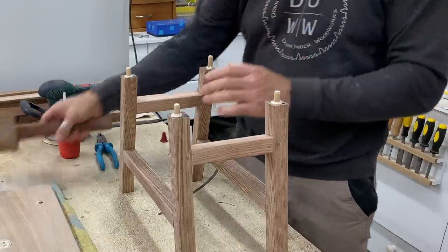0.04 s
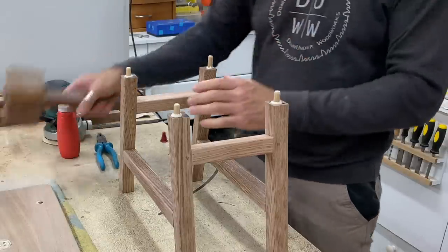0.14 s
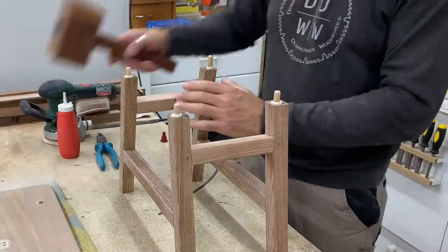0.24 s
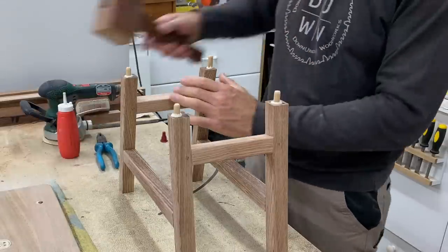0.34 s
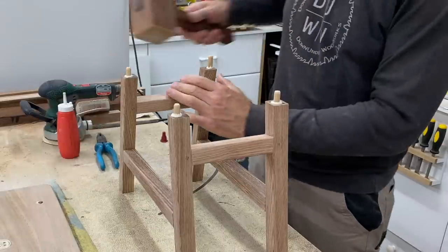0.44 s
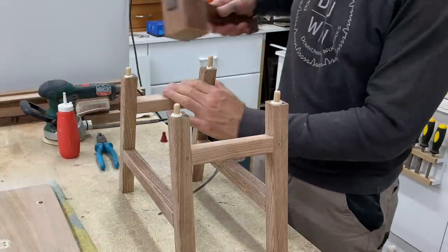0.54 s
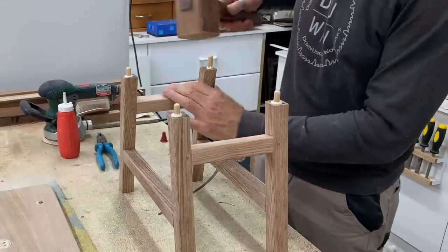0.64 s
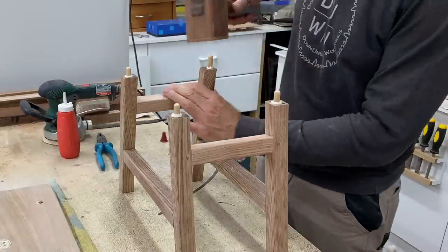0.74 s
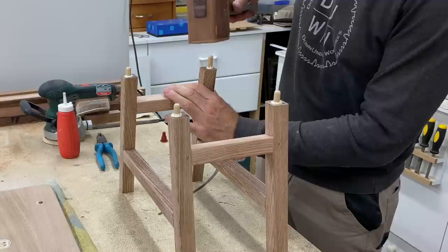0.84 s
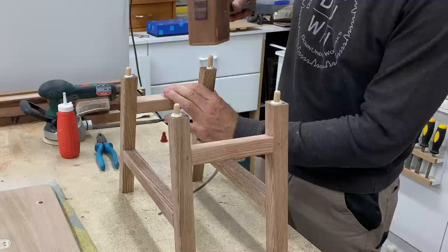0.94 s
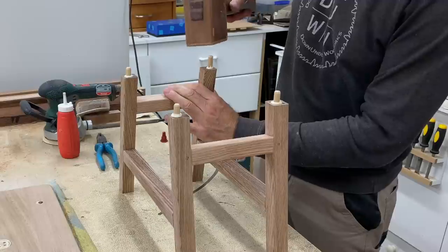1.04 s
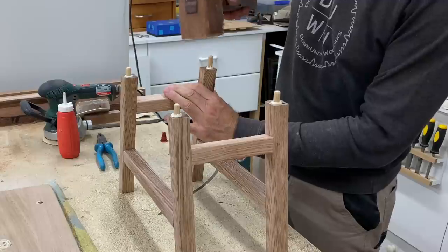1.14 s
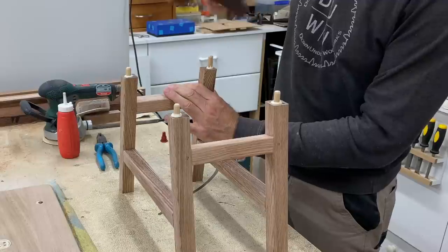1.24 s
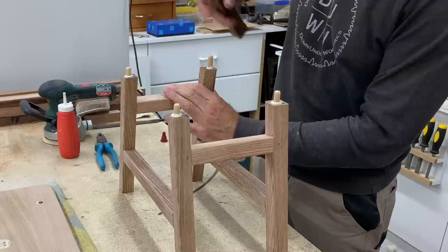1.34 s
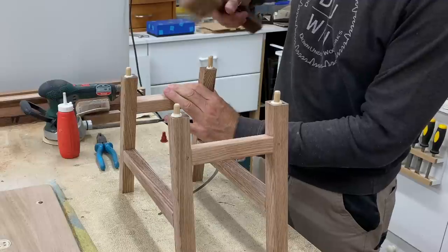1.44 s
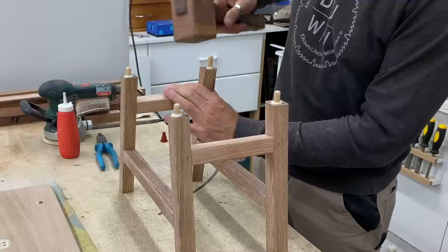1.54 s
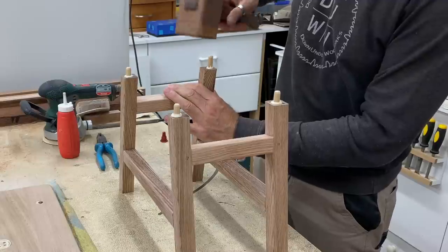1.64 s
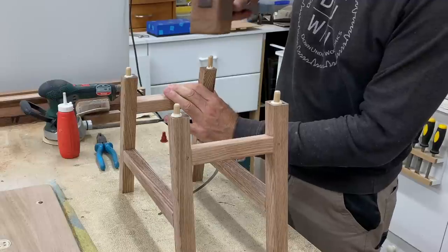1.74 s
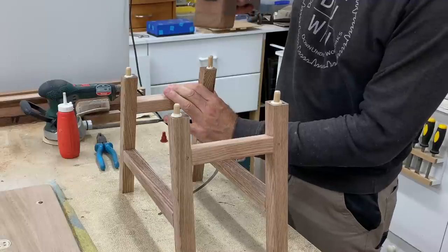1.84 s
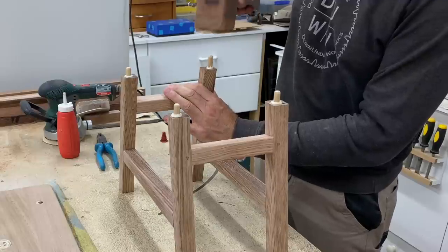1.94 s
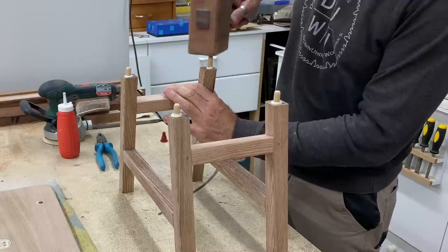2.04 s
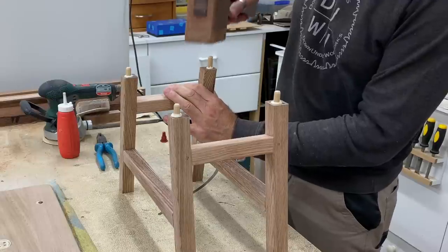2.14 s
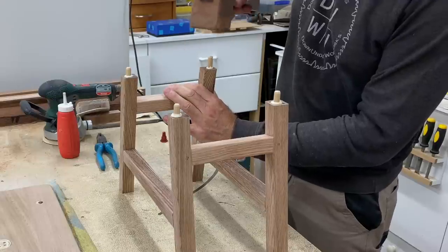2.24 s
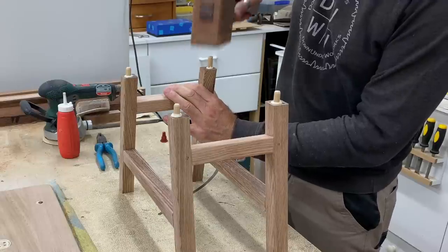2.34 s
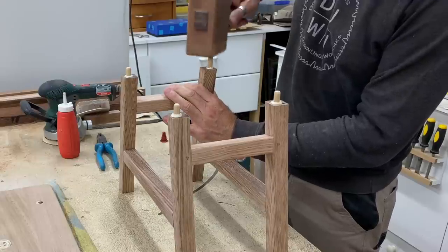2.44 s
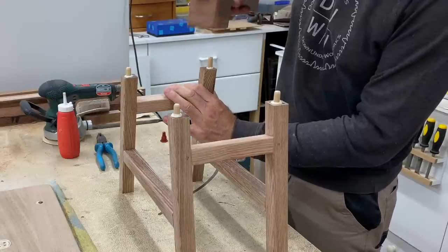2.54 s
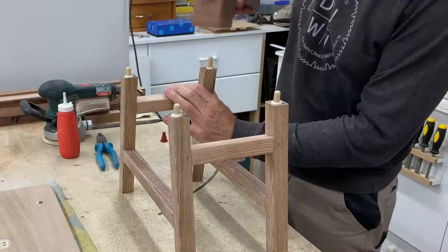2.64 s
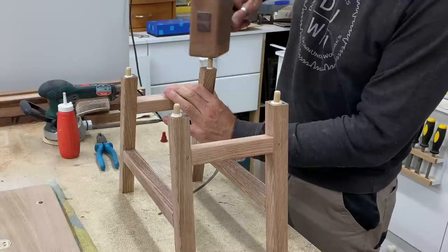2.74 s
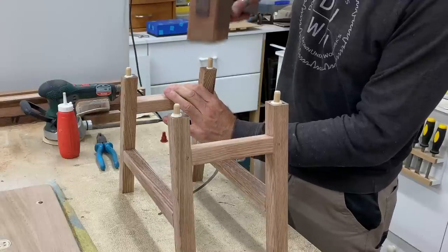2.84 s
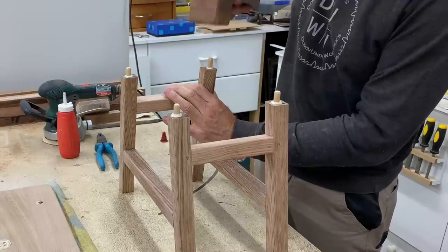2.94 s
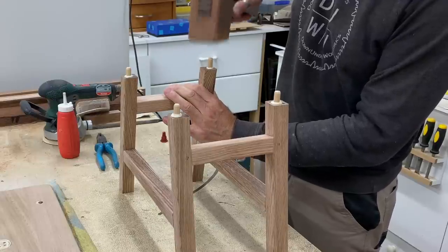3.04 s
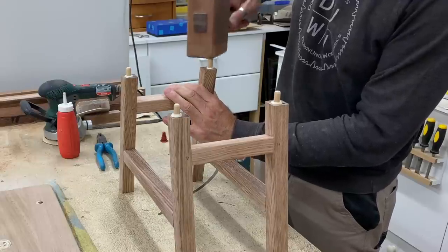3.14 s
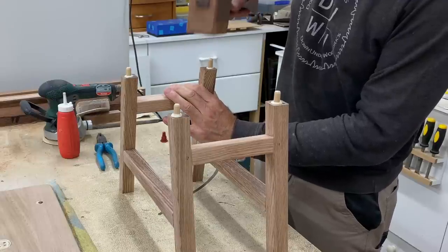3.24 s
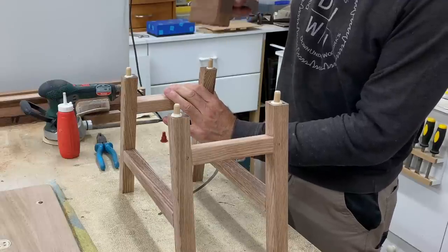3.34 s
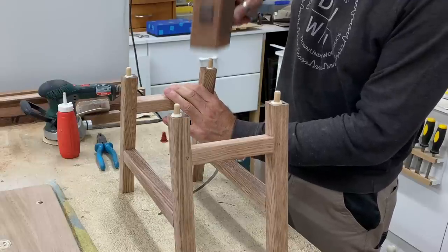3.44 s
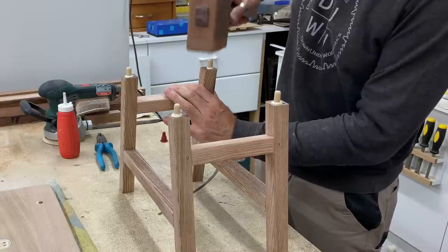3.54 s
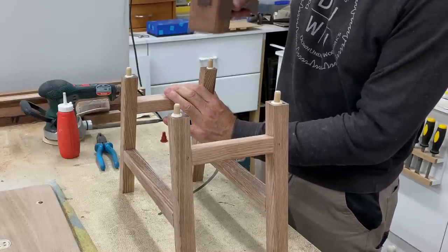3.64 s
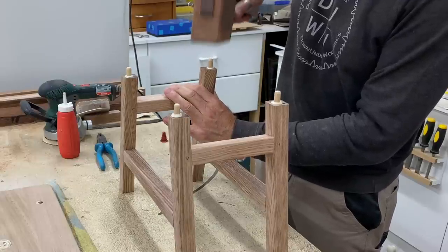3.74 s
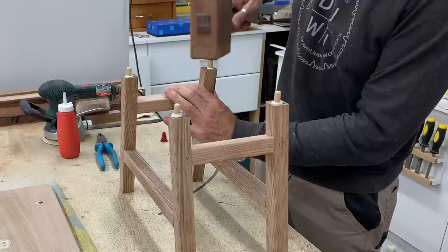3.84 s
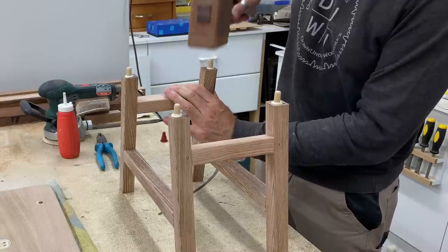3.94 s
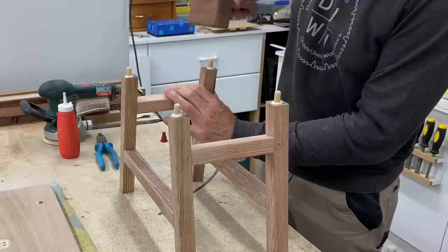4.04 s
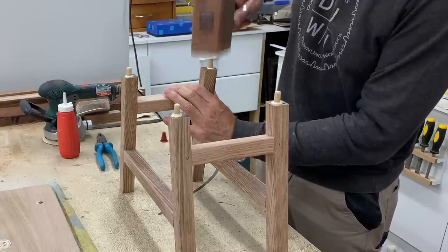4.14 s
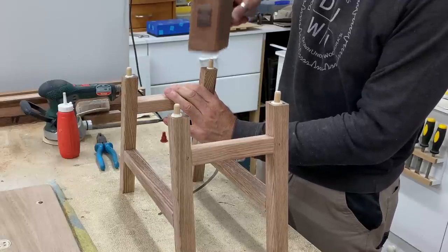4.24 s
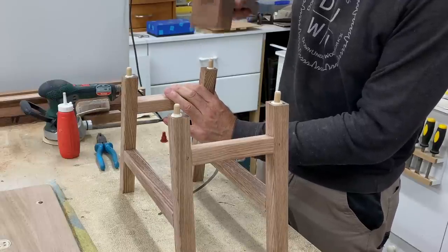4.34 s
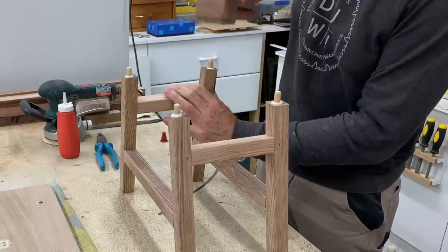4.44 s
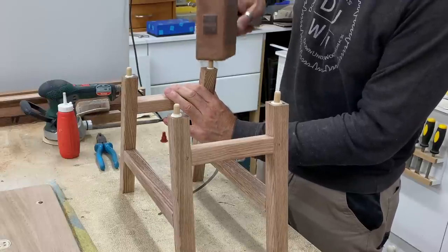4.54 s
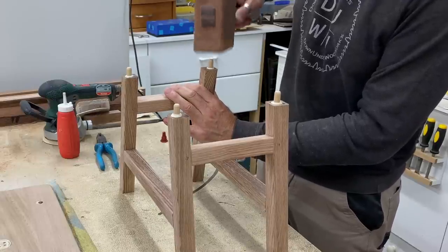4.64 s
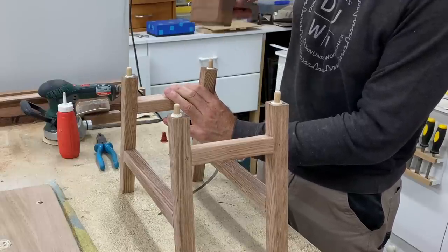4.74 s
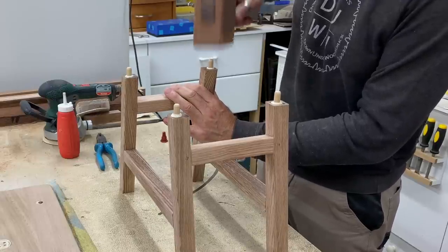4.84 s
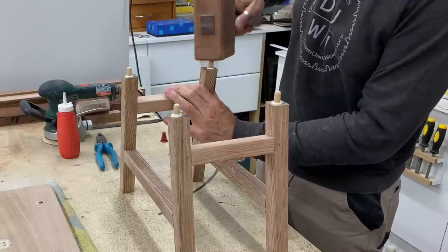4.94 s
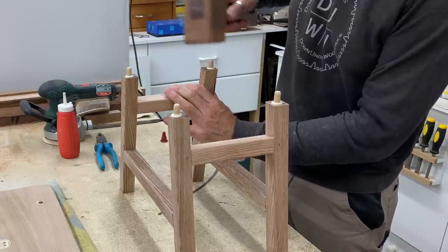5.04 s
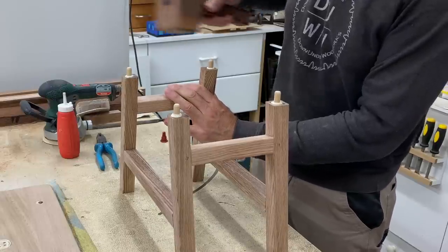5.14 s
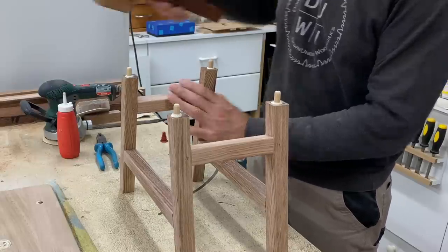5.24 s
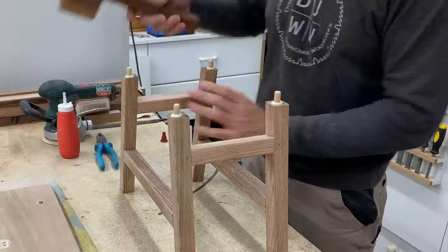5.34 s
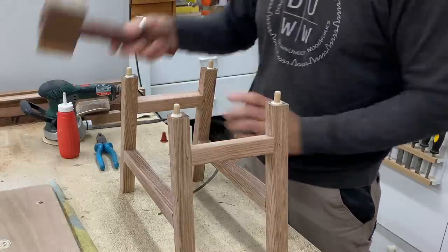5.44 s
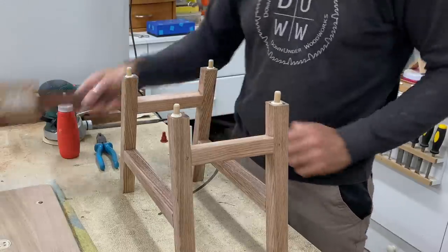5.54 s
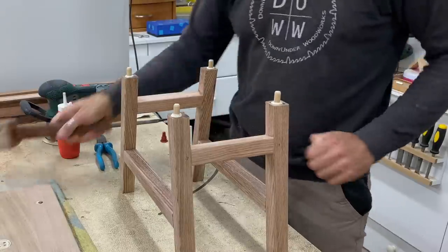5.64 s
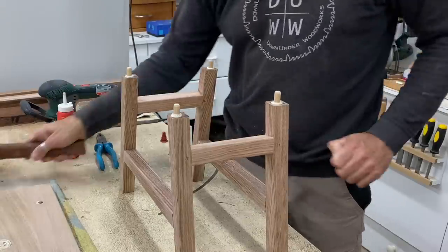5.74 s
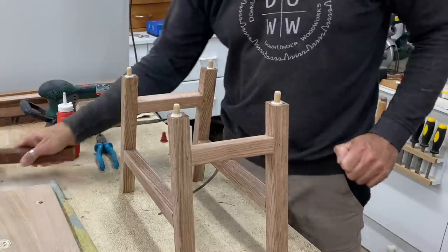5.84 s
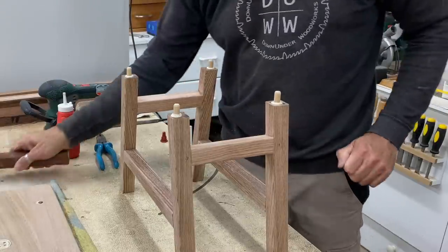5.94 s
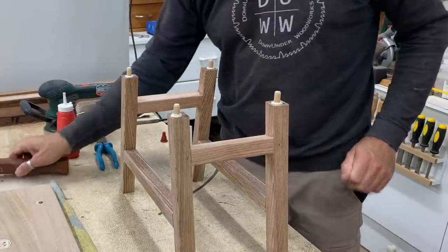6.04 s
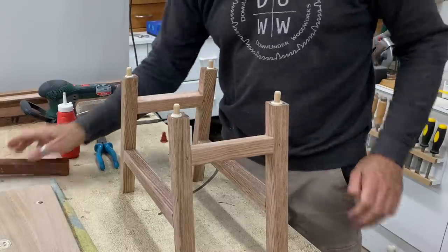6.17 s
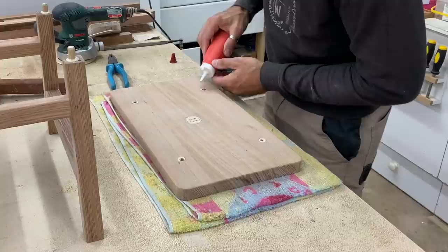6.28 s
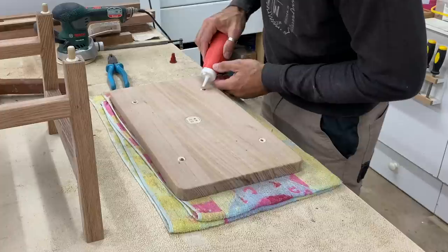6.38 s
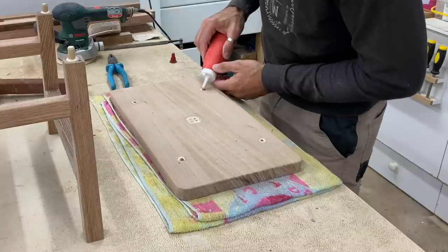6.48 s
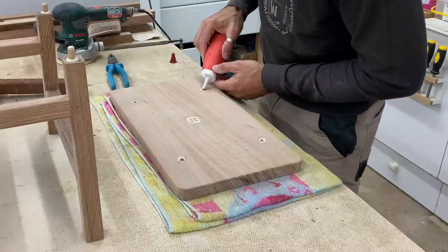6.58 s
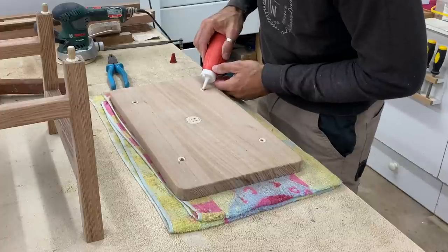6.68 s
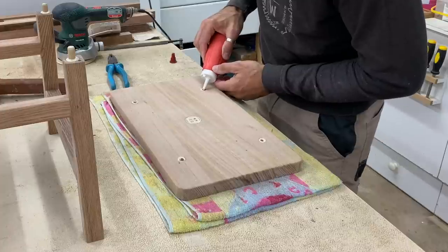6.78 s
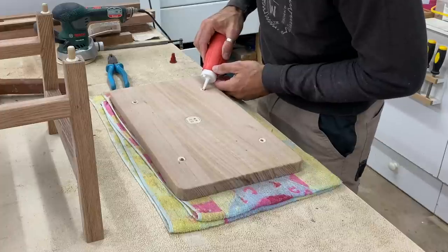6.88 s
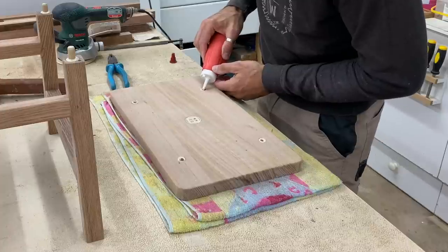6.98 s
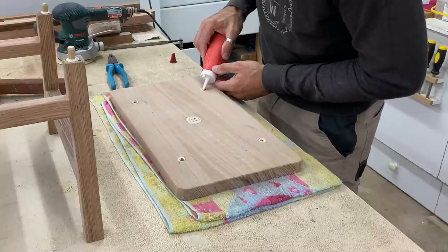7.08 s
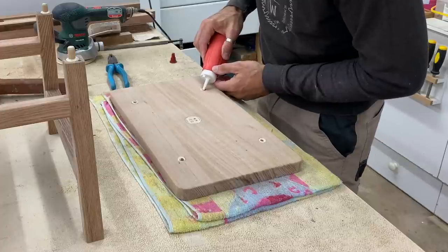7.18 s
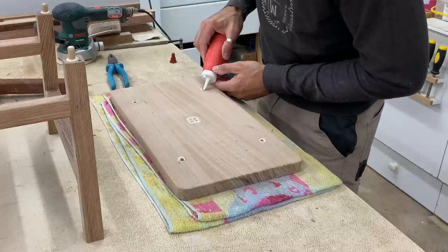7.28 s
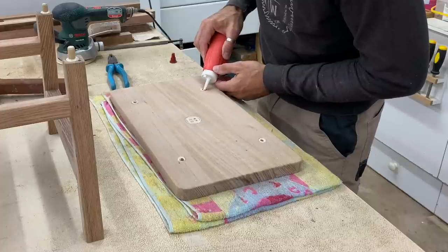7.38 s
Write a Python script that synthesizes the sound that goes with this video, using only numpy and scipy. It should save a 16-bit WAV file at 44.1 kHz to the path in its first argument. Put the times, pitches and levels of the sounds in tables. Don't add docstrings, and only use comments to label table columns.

```python
import sys
import numpy as np
from scipy import signal
from scipy.fft import rfft, irfft, next_fast_len
from scipy.io import wavfile
from scipy.ndimage import uniform_filter1d

SR = 44100
rng = np.random.default_rng(int(sys.argv[2]) if len(sys.argv) > 2 else 0)


def to_wav(sig):
    pcm = np.clip(np.atleast_2d(sig), -1, 1) * 32767
    pcm = np.round(pcm).astype(np.int16)
    wavfile.write(sys.argv[1], SR, pcm.T)


def ratio_of_db(decibels):
    return 10 ** (np.asarray(decibels, float) / 20)


N = 326781
CUT_S = 6.318

# frequency in Hz, level in dB per Hz.
AIR_SPECTRUM = [(30, -27.5), (45, 0.5), (65, 4), (120, -13.5), (200, -20.5), (350, -24.5), (800, -19.5),
                (1400, -26.5), (2500, -30.5), (6000, -39.5), (8000, -45), (11000, -54), (14000, -62.5),
                (16000, -72.5)]
AIR_DB = -57
# frequency in Hz, likeness from -1 to 1.
AIR_LIKENESS = [(60, 0.97), (130, 0.8), (290, 0.54), (640, -0.54), (1410, -0.29), (3100, 0.3), (6820, 0.17),
                (15000, 0.29)]
# frequency in Hz, gain in dB.
BUSIER_AIR = [(30, 2), (150, 7.5), (350, 8.5), (600, 2), (1000, 0.5), (5000, 1), (12000, 0)]
# time in seconds, gain in dB.
AIR_SWELL = [(0, -2), (1.9, -0.5), (5.2, 3.5), (6.3, 2), (6.9, 2), (7.41, 0.5)]

# time in seconds, level in dB.
HUM = [(0, -60.5), (.85, -51.5), (1.3, -52), (1.7, -59), (2.0, -70), (2.3, -63), (2.9, -53), (3.41, -49),
       (3.8, -56), (4.05, -63), (4.3, -53.5), (4.55, -56.5), (4.8, -50), (5.2, -51), (5.5, -50), (5.9, -51),
       (6.16, -46), (6.3, -55.5)]
HUM_HZ, RUMBLE_HZ, RUMBLE_DB = 150.4, 75, -55.5
# loudest moment in seconds, rise in seconds, fall in seconds, level in dB.
WHINE = [(.85, .6, 0.46, -71), (1.95, 1.1, 0.63, -67), (3.4, .8, .8, -73), (4.35, .5, 0.25, -55.5),
         (4.75, .3, .5, -55.5), (5.5, 1.2, 1.9, -64)]
# loudest moment in seconds, rise in seconds, fall in seconds, level in dB.
SURGES = [(1.2, .6, 0.42, -58), (2.65, .8, 1, -49), (4.0, .4, 0.31, -52.5), (4.55, .4, 0.17, -50.5),
          (4.85, .3, 0.14, -44), (5.78, .8, 0.62, -42.5)]

# loudest moment in seconds, rise in seconds, fall in seconds, level in dB.
RUBS = [(.172, 0.034, 0.12, -53.5), (.43, 0.17, 0.21, -63), (.73, .03, .05, -73), (1.31, 0.15, 0.21, -60),
        (1.5, 0.077, 0.05, -49.5), (1.69, .12, .06, -63.5), (4.138, .1, 0.0046, -57),
        (4.47, 0.029, .06, -45), (4.828, 0.017, 0.071, -49.5), (5.3, .6, 1, -70),
        (5.542, 0.011, 0.059, -60), (5.6, .03, .4, -81), (6.3, 0.33, 0.038, -81)]
# loudest moment in seconds, rise in seconds, fall in seconds, level in dB.
PALM = [
    (.124, 0.013, 0.021, -56),
    (.23, .15, 0.11, -74),
    (.5, 0.19, .03, -72),
    (1.31, 0.082, 0.023, -60),
    (1.37, 0.02, .05, -57),
    (1.51, 0.13, 0.025, -61),
    (1.628, .04, 0.064, -67),
]
STROKE_DB = 20
# frequency in Hz, level in dB per Hz.
CLOTH = [(1500, -30.5), (3000, -10.5), (5000, -5.5), (6200, 0.5), (7200, -6), (8500, -0.5), (11000, -7),
         (12000, -6.5), (15500, -13), (16200, -53)]
# frequency in Hz, width in Hz, level in dB.
HOLLOW = [(2150, 220, 8.5), (4340, 590, -10), (6260, 450, -17)]

# blow in seconds, frequency in Hz, level in dB.
LEAD_INS = [
    (4.145, 1200, -38.5),
    (4.507, 1550, -44.5),
    (4.868, 1400, -49),
]
LEAD_IN_S, LEAD_IN_RISE_DB, LEAD_IN_WIDTH_HZ = 0.02, 19.5, 800
# start in seconds, length in seconds, first Hz, last Hz, level in dB.
SLIDES = [
    (5.4, 0.19, 4500, 4500, -73),
    (7.3, .12, 3750, 3900, -71),
    (6.22, .11, 4150, 4550, -66.5),
    (6.18, 0.17, 6400, 6400, -76),
    (6.07, .05, 11300, 11700, -78),
    (6.04, 0.071, 15000, 15000, -77.5),
    (1.4, 0.064, 4500, 4100, -71),
]
SLIDE_WIDTH = 0.057

# start in seconds, peak in dB, frequency in Hz, t60 in seconds.
TICKS = [(.121, -56, 2340, 0.022), (.098, -68, 12000, 0.015), (0.121, -50, 8400, 0.024),
         (0.121, -46.5, 12700, 0.028), (.135, -44.5, 9900, 0.013), (.377, -72, 700, 0.082),
         (1.353, -44.5, 2150, 0.046), (1.358, -58, 900, 0.15), (1.628, -62, 2060, .04),
         (5.54, -61, 11200, .015), (5.598, -58, 5800, 0.024), (6.107, -46, 2150, 0.04)]

# start in seconds, peak in dB, bench thud and face crack in dB against the blow.
BLOWS = [
    (2.019, -19, -10, -18.5),
    (2.373, -20.5, -9, -18.5),
    (2.723, -18, -11, -19.5),
    (3.092, -16.5, -12, -19),
    (3.453, -15, -9.5, -19),
    (3.803, -11.5, -11, -21.5),
    (4.146, -8.5, -15.5, -27.5),
    (4.507, -8.5, -14.5, -30),
    (4.871, -8, -15.5, -29),
]
# start in seconds, peak in dB, bench thud, knock and crack in dB.
SET_DOWN = [
    (5.955, -22, -7.5, -26, -55.5),
    (5.966, -17, -10.5, -11, -34),
    (5.985, -17.5, -17.5, -33, -55),
    (5.997, -25, -5, -18.5, -51.5),
    (6.105, -31.5, -18.5, -9.5, -53),
    (6.113, -29, -20, -12, -46),
]
# frequency in Hz, level in dB, t60 in seconds.
FRAME_ON_BENCH = [(67.5, -0.5, 0.19), (102.8, 1.5, 0.17), (135, -3.5, 0.14), (157.6, -5.5, 0.11), (185, -8.5, 0.12),
                  (241, -7, 0.08), (285, 0, 0.081), (338.8, -4.5, 0.086), (396, -2.5, 0.096), (455, -5.5, 0.081),
                  (528, 3, 0.042), (639, 2, 0.037), (721.3, 2.5, 0.041),
                  (842, -3.5, 0.023), (937, -1.5, 0.045), (1060, -9, 0.065), (1206, -2, 0.0374), (1400, 0.5, 0.019),
         (1636, -1.5, 0.041), (1811, -4.5, 0.038), (2005, 3, 0.015), (2460, -1, 0.02), (2650, -4.5, 0.024),
         (2923, -0.5, 0.016), (3474, -7.5, 0.0039), (4126, -13, 0.014)]
# frequency in Hz, level in dB, t60 in seconds.
MALLET = [(66, -15.5, .15), (88.2, -10, 0.14), (130, -0.5, 0.13), (167.5, -2.5, 0.11), (223, -2.5, 0.099),
          (334, 4, 0.081), (435, -5.5, 0.058), (511, 5, 0.04), (552, -1, 0.046), (633, -4.5, 0.063),
          (756, -6, 0.098), (915, -5, 0.053), (1400, -4, 0.025), (2160, -5, 0.025), (2650, -10, 0.019),
          (3550, -9.5, 0.0089)]
# frequency in Hz, level in dB per Hz.
CRACK = [(2500, -32), (3500, -3.5), (5000, -3), (6200, 1.5), (7200, -6.5), (8200, 1), (11000, -6),
         (14500, -8), (16000, -12), (16900, -31.5)]
KNOCK_DB, KNOCK_PER_CRACK, TOP_DB = 4.5, 0.86, -30.5
SOFT_TOP_DB, TOP_PER_CRACK = -25.5, 0.6
THUD_HZ, THUD_S = 200, 0.01783

# frequency in Hz, t60 in seconds.
ROOM_DECAY = [(60, 0.39), (160, 0.47), (420, 0.39), (1100, 0.38), (2900, 0.33), (7700, 0.33), (15500, 0.29),
              (16300, .02)]
# frequency in Hz, level in dB.
ROOM_DB = [(60, -10), (300, -0.5), (1000, -3), (3000, -0.5), (8000, -2), (15800, -6), (16100, -39.5)]
# frequency in Hz, likeness from -1 to 1.
ROOM_LIKENESS = [(60, 1), (130, 0.87), (290, 0.83), (640, 0.1), (1400, -0.093), (3100, 0.18), (5500, 0.48),
                 (7000, 1)]

# frequency in Hz, left over right in dB.
PORT_BALANCE = [(60, 3.5), (130, 0.5), (290, 2), (640, 0.5), (1410, -0.5), (3100, 2.5), (6820, 1.5),
                (15000, -2.5)]
WIDEN_HZ, WIDEN_TURN_HZ = 6950, 4250
# frequency in Hz, gain in dB.
MICROPHONE = [(20, -12), (42, -7), (58, 0), (16000, 1.5)]


def evened(x):
    return x / np.sqrt(np.mean(x ** 2) + 1e-20)


def read(points, hz):
    f, value = np.transpose(points)
    return np.interp(np.log(hz + 1), np.log(f + 1), value)


def add(mix, s, sound):
    part = mix[round(s * SR):][:len(sound)]
    part += sound[:len(part)]


def coloured(x, points):
    return irfft(rfft(x) * ratio_of_db(read(points, np.fft.rfftfreq(len(x), 1 / SR))), len(x))


def resonate(x, hz, width):
    turn = np.exp(2j * np.pi * np.cumsum(hz * np.ones(len(x))) / SR)
    r = np.exp(-np.pi * width / SR)
    return 2 * (turn * signal.lfilter([1 - r], [1, -r], x / turn)).real


def resonate_twice(x, hz, width):
    return resonate(resonate(x, hz, width), hz, width)


def wander(rate):
    t = np.arange(0, N + 256, 256)
    slow = 0
    for f in np.geomspace(rate / 10, rate, 20):
        slow = slow + np.sin(2 * np.pi * (f * t / SR + rng.random())) / np.sqrt(f)
    return np.interp(np.arange(N), t, evened(slow))


def strokes(rows):
    t = np.arange(0, N + 32, 32) / SR
    level = np.zeros(len(t))
    for s, rise, fall, db in rows:
        level += ratio_of_db(db - STROKE_DB * np.maximum((s - t) / rise, (t - s) / fall))
    return np.interp(np.arange(N) / SR, t, level)


def pair(length, same, gain):
    hz = np.fft.rfftfreq(1024, 1 / SR)[:, None]
    t = np.arange(length // 256 + 5) * 256 / SR
    a, b, c, d = rng.standard_normal((len(t), 513, 4)).T
    like = np.clip(read(same, hz), -1, 1)
    left = a + 1j * b
    right = like * left + np.sqrt(1 - like ** 2) * (c + 1j * d)
    z = np.array([left, right]) * gain(hz, t)
    return signal.istft(z, nperseg=1024, noverlap=768)[1][:, :length] / 17.5


def air():
    def gain(hz, t):
        drift_db = np.interp(t, *np.transpose(AIR_SWELL))
        return ratio_of_db(read(AIR_SPECTRUM, hz) + read(BUSIER_AIR, hz) * (t < CUT_S) + drift_db)

    x = pair(N, AIR_LIKENESS, gain)
    return ratio_of_db(AIR_DB) * x / np.std(x[:, -SR:])


def machine():
    hum_db = np.interp(np.arange(N) / SR, *np.transpose(HUM))
    turn = 2 * np.pi * np.cumsum(HUM_HZ * (1 + 0.0036 * wander(3))) / SR
    hum = ratio_of_db(hum_db + 3.5 + 0.99 * wander(14)) * np.sin(turn)
    hum += ratio_of_db(3.5) * strokes(WHINE) * (np.sin(2 * turn) + ratio_of_db(-13) * np.sin(3 * turn))
    centre_hz = RUMBLE_HZ * (1 + 0.14 * wander(2))
    rumble = resonate(resonate(rng.standard_normal(N), centre_hz, 20), centre_hz, 24)
    return hum + (ratio_of_db(RUMBLE_DB) + strokes(SURGES)) * evened(rumble)


def rubbing():
    fine_grain = evened(uniform_filter1d(rng.standard_normal(N), 100))
    grit = rng.standard_normal(N) * ratio_of_db(2.7 * fine_grain + 2.0 * wander(60))
    hiss = evened(coloured(grit, CLOTH))
    hollow = evened(sum(ratio_of_db(db) * resonate_twice(grit, hz, width) for hz, width, db in HOLLOW))
    sleeve = ratio_of_db(-7) * uniform_filter1d(strokes(RUBS), 300) * hiss
    return ratio_of_db(-1.5) * strokes(PALM) * hollow + sleeve


def lead_ins():
    out = np.zeros(N)
    for s, hz, db in LEAD_INS:
        u = np.linspace(-1, 0, round(LEAD_IN_S * SR))
        band = resonate_twice(rng.standard_normal(len(u)), hz, LEAD_IN_WIDTH_HZ)
        add(out, s - LEAD_IN_S, ratio_of_db(db + LEAD_IN_RISE_DB * u) * evened(band))
    return out


def slides():
    out = np.zeros(N)
    for s, length, from_hz, to_hz, db in SLIDES:
        u = np.linspace(0, 1, round(length * SR))
        glide_hz = from_hz + (to_hz - from_hz) * u
        band = resonate(rng.standard_normal(len(u)), glide_hz, SLIDE_WIDTH * to_hz)
        add(out, s, ratio_of_db(db) * np.sqrt(np.sin(np.pi * u).clip(0)) * evened(band))
    return out


def ticks():
    out, t = np.zeros(N), np.arange(4000) / SR
    for s, db, hz, t60 in TICKS:
        band = evened(resonate_twice(rng.standard_normal(len(t)), hz, 0.18 * hz))
        add(out, s, ratio_of_db(db - 60 * t / t60) * np.minimum(t / 0.001, 1) * band)
    return out


def crowded(modes, count, lesser_db):
    hz = np.geomspace(430, modes[-1][0], count) * rng.uniform(0.99, 1.02, count)
    main_hz, main_db, main_t60 = np.transpose(modes)
    db = np.interp(hz, main_hz, main_db) + lesser_db + 3 * rng.standard_normal(count)
    every = np.vstack([modes, np.transpose([hz, db, np.interp(hz, main_hz, main_t60)])])
    together = np.pi / 2 - 2 * np.pi * every[:, 0] * THUD_S
    scattered = rng.uniform(0, 2 * np.pi, len(every))
    return np.c_[every, np.where(every[:, 0] < THUD_HZ, together, scattered)]


def knock(row, modes, lag_turns, spread_db):
    s, peak_db, thud_db, knock_db, crack_db, top_db = row
    hz, db, t60, phase = np.transpose(modes)[:, :, None]
    t = np.arange(6500) / SR
    vary = rng.standard_normal((3, len(modes), 1))
    tilt = [(150, thud_db + 12.5), (290, 0.41 * np.clip(peak_db + 18, -6, 6)),
            (430, 0.5 * np.clip(peak_db + 12.5, -6, 6)), (620, 0.0036), (1270, -2.0),
            (1400, -7.5), (1620, -12), (1760, knock_db + 5.0)]
    db = db + read(tilt, hz) + spread_db * vary[0]
    swell = np.minimum(t * hz / lag_turns, 1) ** 2
    wave = np.sin(2 * np.pi * hz * (1 + 0.0042 * vary[1]) * t + phase + 0.37 * vary[2])
    ring = ratio_of_db(db - 60 * t / t60) * swell * wave
    crack = evened(coloured(rng.standard_normal(len(t)), CRACK))
    crack = coloured(crack, [(7000, crack_db), (10000, top_db + 6.0)])
    lingering = coloured(crack, [(15800, 1), (16100, -39)])
    crack = 0.9 * ratio_of_db(-60 * t / 0.0082) * crack + 0.2 * ratio_of_db(-60 * t / 0.082) * lingering
    fade = np.cos(np.pi / 2 * t / t[-1]) ** 0.5
    return s + 0.0004, ratio_of_db(peak_db + 3.5) * fade * (ratio_of_db(-9.5) * ring.sum(0) + ratio_of_db(4) * crack)


def mallet():
    out = np.zeros(N)
    frame = crowded(FRAME_ON_BENCH, count=90, lesser_db=-10.5)
    head = crowded(MALLET, count=90, lesser_db=-9)
    for s, peak_db, thud_db, crack_db in BLOWS:
        row = s, peak_db, thud_db, KNOCK_DB + KNOCK_PER_CRACK * crack_db, crack_db, TOP_DB
        add(out, *knock(row, frame, lag_turns=1.78, spread_db=1.04))
    for row in SET_DOWN:
        top_db = SOFT_TOP_DB + TOP_PER_CRACK * row[-1]
        add(out, *knock((*row, top_db), head, lag_turns=1.4, spread_db=3.5))
    return out


def tail():
    t = np.arange(SR // 2) / SR
    flat = pair(len(t), ROOM_LIKENESS, lambda hz, s: ratio_of_db(read(ROOM_DB, hz)) / np.sqrt(read(ROOM_DECAY, hz)))
    hz, z = np.fft.rfftfreq(len(t), 1 / SR), rfft(flat)
    bands = 0
    for (f, t60), one_band in zip(ROOM_DECAY, np.eye(len(ROOM_DECAY))):
        share = np.interp(np.log(hz + 1), np.log(ROOM_DECAY)[:, 0], one_band)
        bands = bands + irfft(z * share, len(t)) * ratio_of_db(-60 * t / t60)
    onset = 1 - np.exp(-np.maximum(t - 0.003, 0) / 0.00043)
    return bands * onset * np.sqrt(2 * np.log(1000) / SR)


def room(x):
    drift = 2.126 * np.arange(N) / SR
    out = 0
    for share in (np.sin(drift), np.cos(drift)):
        out = out + signal.oaconvolve((x * share)[None], tail(), axes=1)[:, :N]
    return out


def scene():
    near = mallet() + ticks() + rubbing() + lead_ins() + slides()
    first = near + room(near) + machine()
    return first * np.clip((CUT_S - np.arange(N) / SR) / 0.0064, 0, 1) + air()


def band_limit(x):
    return signal.sosfilt(signal.butter(12, 16960, fs=SR, output="sos"), x)


def record(dry):
    size = next_fast_len(N)
    hz, z = np.fft.rfftfreq(size, 1 / SR), rfft(dry, size)
    single = np.clip((hz - 6300) / 900, 0, 0.9)
    z = (1 - single) * z + single * z[0]
    turn = np.exp(1j * np.pi * np.maximum(hz - WIDEN_HZ, 0) / WIDEN_TURN_HZ)
    port_db = np.outer([0.5, -0.5], read(PORT_BALANCE, hz)) + read(MICROPHONE, hz)
    x = irfft(z * [1 / turn, turn] * ratio_of_db(port_db), size)[:, :N]
    return band_limit(0.4 * np.tanh(x / 0.38))


dry = scene()
out = record(dry)
to_wav(out)
```